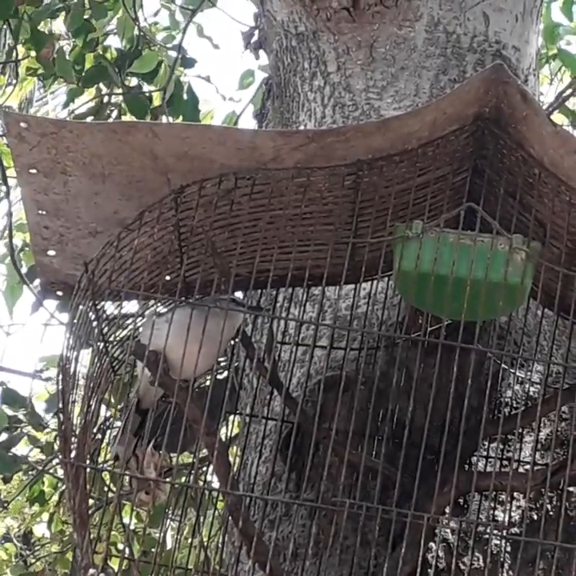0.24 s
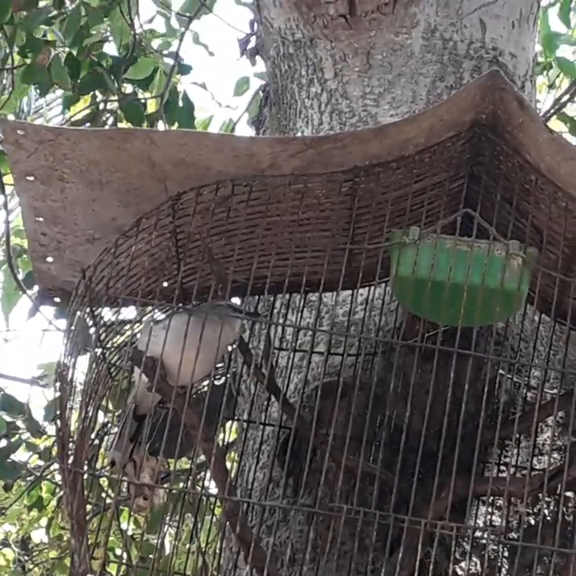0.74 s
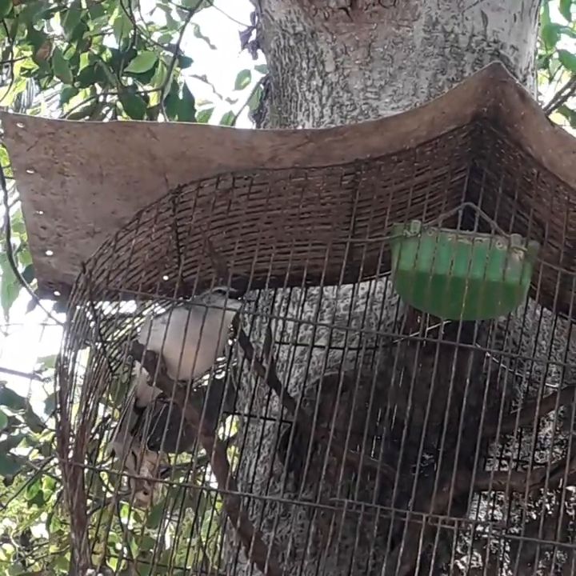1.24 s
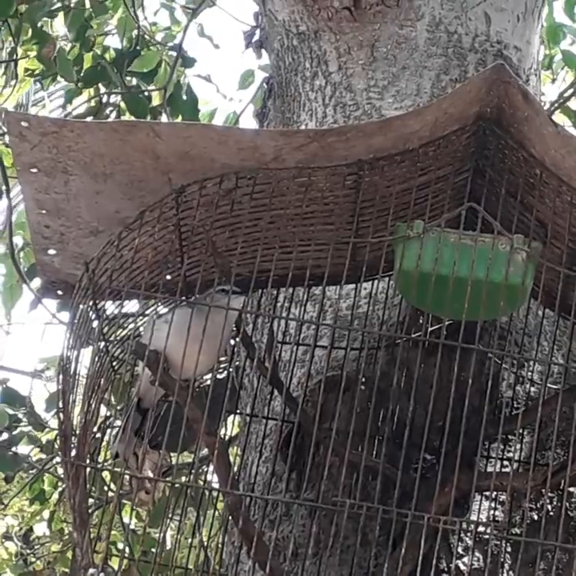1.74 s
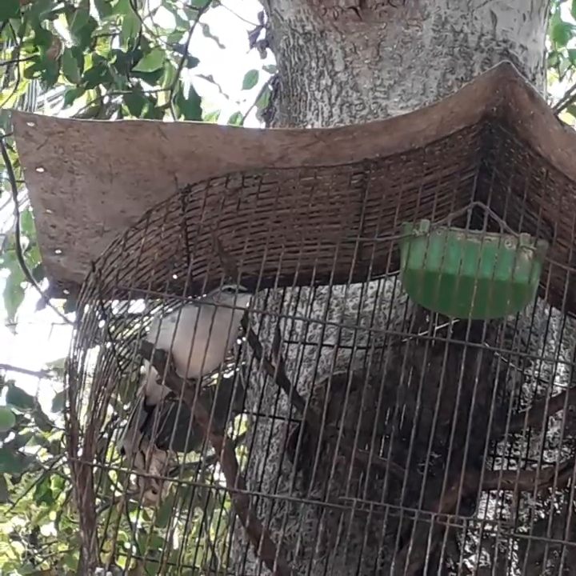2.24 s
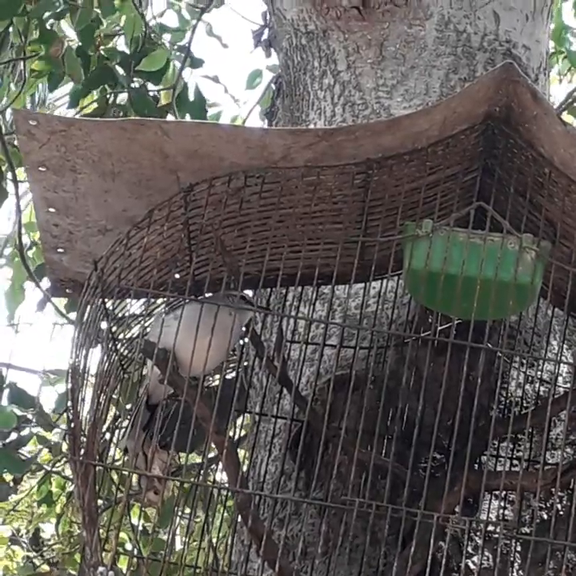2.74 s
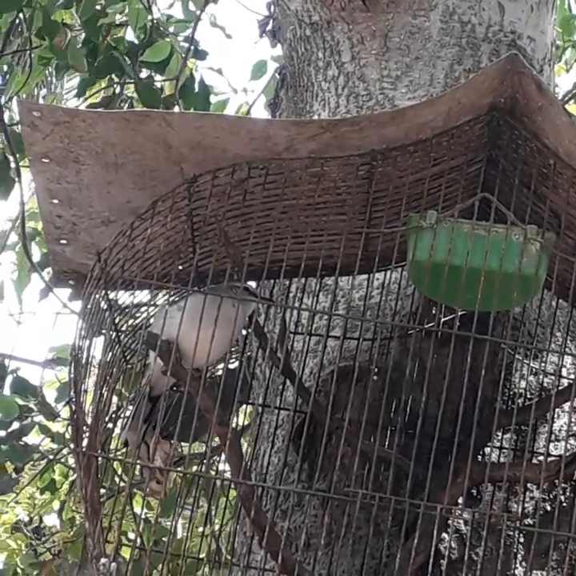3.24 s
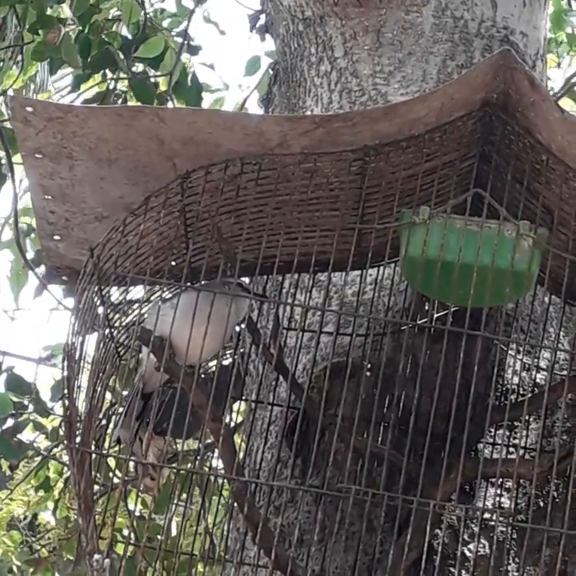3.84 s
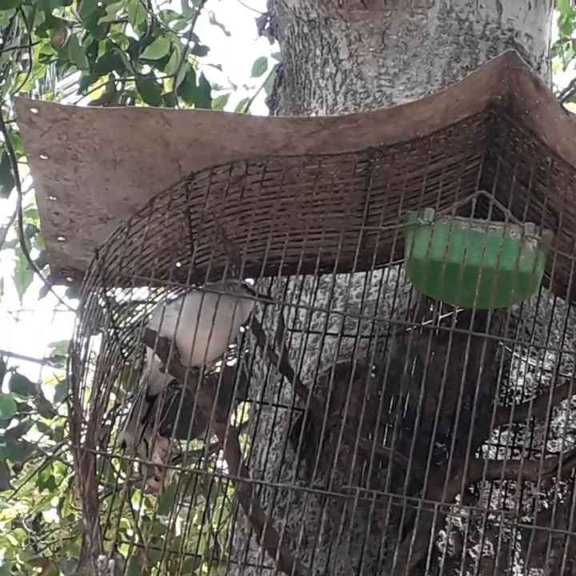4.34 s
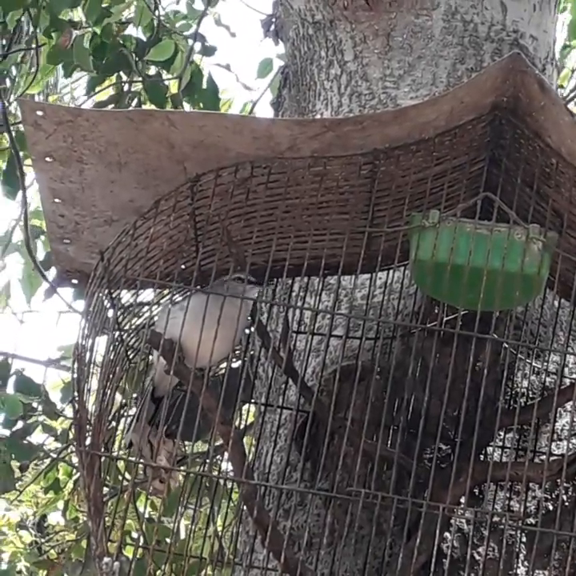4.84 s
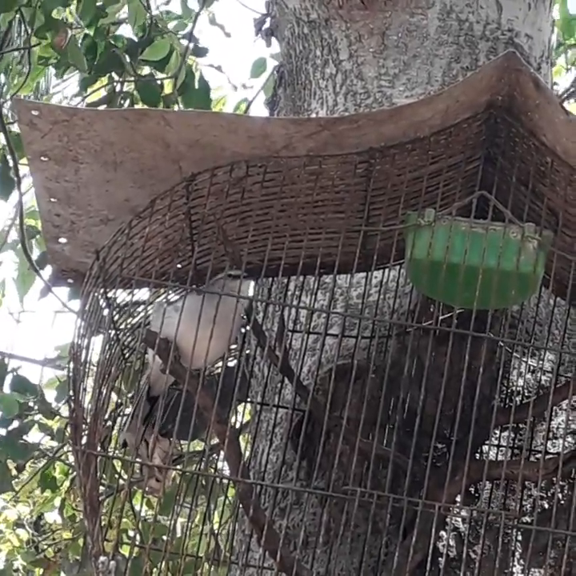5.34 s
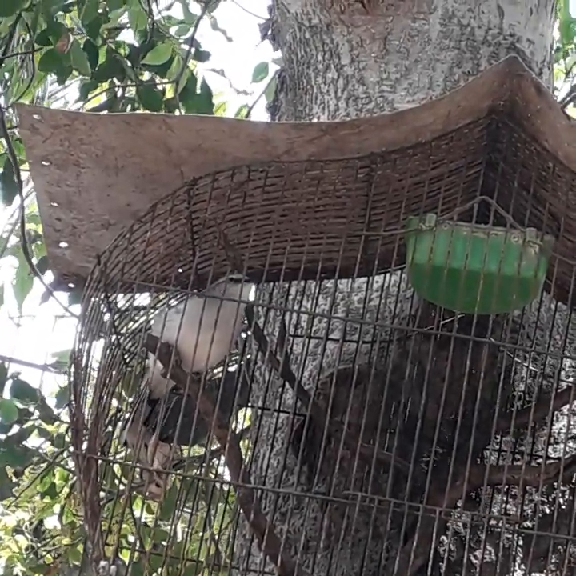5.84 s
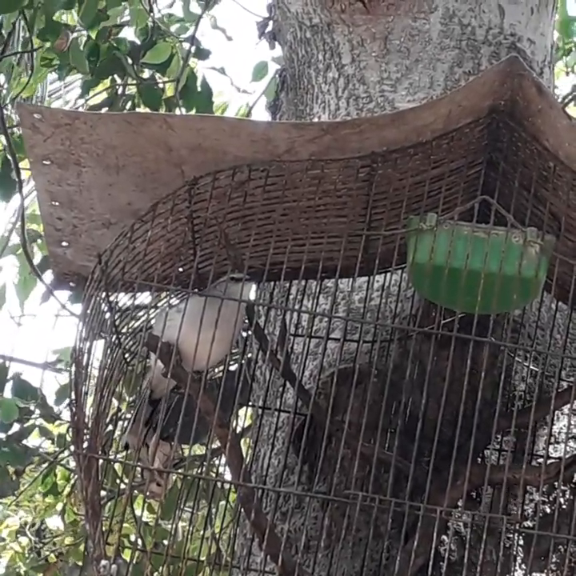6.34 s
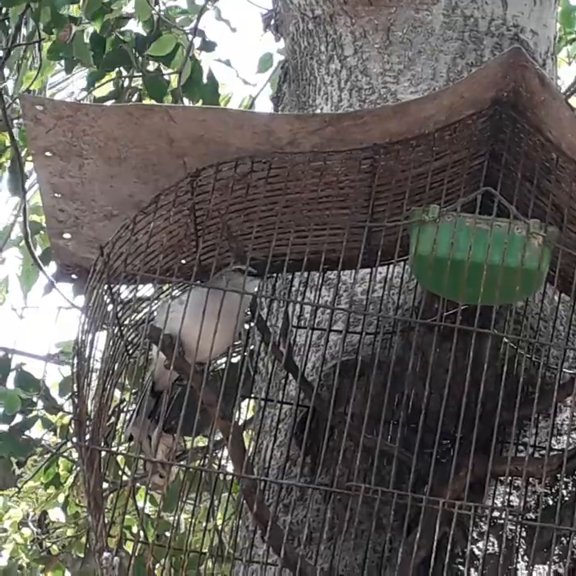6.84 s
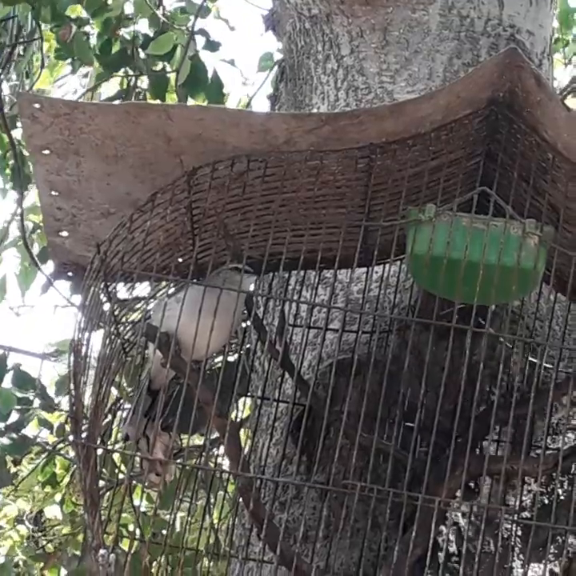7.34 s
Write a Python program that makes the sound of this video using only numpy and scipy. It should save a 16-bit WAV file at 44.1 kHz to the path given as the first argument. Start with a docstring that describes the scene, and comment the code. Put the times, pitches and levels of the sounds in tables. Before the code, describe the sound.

Outdoors, a single caged bird gives a varied, loud song with hard early echoes and a short reverberant tail. Repeated three-part chirps give way to a dry chuck, a grating rasp, then five stuttering buzzes flipping up high, one overlapped by a breathy wheeze. Long fluttering whistles sink and climb near the end. Quiet hiss, low rumble and a few dull knocks sit behind.

```python
"""Caged mockingbird in a walled yard

After the last moment of a buzzy upslur, a bird gives six quick chirps, a chuck, a rasp and five buzzy
upslurs, with a wheeze over the second, then two long whistles that dip and rise, and a third cut off
as it sinks. Gliding tones with a fast tremor make the clear notes; click trains and noise shaped by
the throat make the harsh ones. Roof and walls echo. Behind it, shaped noise and fuzzy hums make a
town rumble and a hiss, with dull knocks and far tones."""
import sys
import numpy as np
from scipy import signal
from scipy.fft import rfft, irfft, next_fast_len
from scipy.io import wavfile
from scipy.ndimage import uniform_filter1d, map_coordinates

SR = 44100
rng = np.random.default_rng(int(sys.argv[2]) if len(sys.argv) > 2 else 0)


def unload_audio(sound):
    """Save the sound as a 16-bit wav file, at the path given as the first command line argument."""
    columns = np.transpose(np.atleast_2d(sound))
    # keep every value between -1 and 1, then stretch to whole-number steps
    steps = np.round(np.clip(columns, -1, 1) * 32767)
    wavfile.write(sys.argv[1], SR, steps.astype(np.int16))


N = 333837  # length of the scene in samples

# Levels in the tables are those of each part before it is mixed, echoed and picked up.


def amp(db):
    """Turn decibels into gain."""
    return 10 ** (np.asarray(db) / 20)


def unit(x):
    """Scale a sound to an rms strength of 1."""
    return x / np.sqrt(np.mean(x ** 2) + 1e-20)


def along(points, hz):
    """Read a curve of (Hz, value) points, with pitch on a log axis."""
    point_hz, value = np.transpose(points)
    return np.interp(np.log(hz + 1), np.log(point_hz + 1), value)


def level(rows):
    """Gain at every sample from (time_s, level_db) rows, silent outside them."""
    time_s, db = np.transpose(rows)
    return amp(np.interp(np.arange(N) / SR, time_s, db, left=-120, right=-120))


def drift(rows):
    """Gain at every sample from (time_s, level_db) rows, held beyond the ends."""
    time_s, db = np.transpose(rows)
    return amp(np.interp(np.arange(N) / SR, time_s, db))


def wobble(rate, samples=None):
    """A smooth random curve with rate knots a second, at the given samples (all by default)."""
    knots = rng.standard_normal(N // 8)
    if samples is None:
        samples = np.arange(N)
    return map_coordinates(knots, [samples * rate / SR], order=2, mode="wrap")


def filtered(x, response):
    """Multiply the spectrum of a sound by a response that depends on frequency."""
    size = next_fast_len(N + SR // 2)
    hz = np.fft.rfftfreq(size, 1 / SR)
    return irfft(rfft(x, size) * response(hz), size)[:N]


def coloured(x, spectrum):
    """Shape a sound by (Hz, dB) points, then scale it to rms 1."""
    return unit(filtered(x, lambda hz: amp(along(spectrum, hz))))


def swell(u, peak, rise_db, fall_db):
    """Level in dB along a note (u from 0 to 1): it grows to its loudest moment, then fades."""
    return np.interp(u, [0, np.clip(peak, .01, .99), 1], [-rise_db, 0, -fall_db])


def mockingbird():
    """The whole song, from gliding tones and harsh noises; each chirp is a hook, a pip and a plunge."""
    song = chirps() + amp(-2) * buzzy_upslurs() + long_whistles()
    return song + chuck() + rasp() + wheeze()


def chirps():
    """Six chirps: a low hook with a second voice beside it, a clear pip and a hoarse plunge."""
    # soft low hooks: start_s, length_s, top_pitch_hz, level_db
    hook_rows = [(0.805, 0.034, 2365, -34), (1, 0.046, 2174, -27), (1.178, .052, 2115, -27),
                 (1.387, 0.05, 2115, -28), (1.619, .044, 1807, -35), (1.858, 0.051, 2035, -31)]
    # the other side of the syrinx beside each hook: s after its start, pitch_hz, dB against the hook
    flick_shape = [(-.012, 2420, -11), (.003, 2950, -9.5), (.018, 3450, -14.5)]
    # clear pips: start_s, length_s, first_pitch_hz, last_pitch_hz, level_db, loudest (share of length)
    pip_rows = [(.832, .062, 2316, 2464, -18, .82), (1.045, 0.038, 2326, 2703, -13, 0.3),
                (1.233, 0.046, 2520, 2641, -14.5, 0.098), (1.429, 0.048, 2195, 2782, -16, 0.41),
                (1.665, .056, 2305, 2650, -14.5, 0.18), (1.921, 0.037, 2284, 2630, -16, .14)]
    # hoarse plunges: start_s, length_s, settling_pitch_hz, plunge_time_s,
    # share of pitch lost at the end, level_db, loudest (share of length)
    plunge_rows = [(.899, .059, 4283, .012, .03, -13.5, 0.77), (1.104, 0.045, 4443, .004, .15, -10.5, .42),
                   (1.29, 0.049, 4252, 0.0044, 0.072, -9.5, 0.44),
                   (1.501, .031, 4223, 0.0041, 0.11, -13, 0.64),
                   (1.717, 0.0088, 3400, 0.0019, 0.066, -15.5, 0.7),
                   (1.736, 0.037, 4025, .0024, .27, -12.5, 0.08),
                   (1.817, 0.03, 3380, .004, 0.094, -22, 0.52), (1.994, .041, 4126, .002, .1, -16, 0.25)]
    hooks = syrinx([hook(*row) for row in hook_rows], tremor_hz=103, tremor_depth=0.02, throb_db=2.6,
                   jitter=0.02, tremor_from=1, tremor_to=0.88, hoarse=0.028, overtone_db=5)
    flick_notes = [np.add(flick_shape, (start, 0, db)) for start, _, _, db in hook_rows]
    flicks = syrinx(flick_notes, tremor_hz=107, tremor_depth=0.009, throb_db=3.0,
                    jitter=0.012, tremor_from=1, tremor_to=1)
    pips = syrinx([pip(*row) for row in pip_rows], tremor_hz=104.2, tremor_depth=0.024, throb_db=-0.5,
                  jitter=0.017, tremor_from=1, tremor_to=0.81, hoarse=0.022, overtone_db=-2.5)
    plunges = syrinx([plunge(*row) for row in plunge_rows], tremor_hz=413.4, tremor_depth=.028,
                     throb_db=0.5, jitter=0.036, tremor_from=1.5, tremor_to=0.31,
                     hoarse=0.11, overtone_db=-5.0)
    return hooks + flicks + pips + plunges


def hook(start, length, top_hz, db):
    """A quick flick up that sags again, as (s, Hz, dB) points."""
    # share of the length, pitch ratio to the top pitch, dB against the hook's level
    hook_shape = [(0, .74, -11), (0.301, 0.95, 4), (1, .92, -10)]
    u, ratio, shape_db = np.transpose(hook_shape)
    return np.transpose([start + u * length, top_hz * ratio, db + shape_db])


def pip(start, length, first_hz, last_hz, db, peak):
    """A clear note whose rise levels off, as (s, Hz, dB) points."""
    u = np.linspace(0, 1, 40)
    bend = 1.71  # above 1, the rise flattens out
    hz = last_hz + (first_hz - last_hz) * (1 - u) ** bend
    return np.transpose([start + u * length, hz, db + swell(u, peak, rise_db=6, fall_db=13.5)])


def plunge(start, length, settle_hz, plunge_s, droop, db, peak):
    """The membrane slackens: the pitch drops, settles as the note gains strength, and droops at the end."""
    u = np.linspace(0, 1, 60)
    start_ratio, droop_power = 1.66, 3  # first pitch over settling pitch; how late the droop comes
    high_loss_db = 26  # the note is weaker while high
    tension = np.exp(-u * length / plunge_s)
    hz = settle_hz * (1 + (start_ratio - 1) * tension) * (1 - droop * u ** droop_power)
    note_db = db - high_loss_db * tension + swell(u, peak, rise_db=6, fall_db=13.5)
    return np.transpose([start + u * length, hz, note_db])


def buzzy_upslurs():
    """All the buzzy notes that break upward, added together; the first has begun before the scene."""
    # start_s, low_part_s, high_part_s, tremor_hz, low_pitch_hz, top_pitch_hz,
    # low_db, high_db, growth_db, loudest (share of the low part)
    upslur_rows = [(-.1, 0.089, 0.055, 71, 2700, 3900, -28, -32, 20, .7),
                   (3.854, .076, .09, 81.9, 2468, 3504, -17.5, -21, 30, 0.77),
                   (4.059, 0.079, 0.098, 81.3, 2582, 4130, -14.5, -16.5, 23.5, 0.64),
                   (4.312, 0.094, .063, 69.74, 2610, 4435, -16, -16.5, 13, 0.63),
                   (4.538, .102, 0.1, 57.8, 2528, 4840, -16, -19.5, 28, 0.43),
                   (4.808, 0.087, 0.11, 70.25, 2392, 4610, -19, -20.5, 22, 0.57)]
    return sum(upslur(*row) for row in upslur_rows)


def upslur(start, low_s, high_s, tremor_hz, low_hz, top_hz, low_db, high_db, growth_db, peak):
    """A low stuttering buzz swells, breaks into the high register and climbs."""
    # low part: share of the part, Hz above the low pitch
    low_shape = [(0, 111.5), (.35, -31.5), (.7, 90.5), (1, 291.5)]
    # high part: share of the part, share of the rise in pitch, dB against high_db
    high_shape = [(.06, .42, -0.5), (.34, .77, -3.5), (.6, .93, -9), (1, 0.93, -7.5)]
    u = np.linspace(0, 1, 30)
    offset_hz = np.interp(u, *np.transpose(low_shape))
    buzz_db = low_db + swell(u, peak, growth_db, fall_db=7)
    low = [start + u * low_s, low_hz + offset_hz, buzz_db]
    v, rise, shape_db = np.transpose(high_shape)
    high = [start + low_s + v * high_s, low_hz + (top_hz - low_hz) * rise, high_db + shape_db]
    return syrinx([np.hstack([low, high]).T], tremor_hz=tremor_hz, tremor_depth=0.079, throb_db=5.5,
                  jitter=0.026, tremor_from=1.31, tremor_to=0.64, hoarse=0.013, overtone_db=-6.5)


def long_whistles():
    """Trilled whistles, the last cut off as it sinks, with high noise following as a sizzling edge."""
    # start_s, fall_s, rise_s, hold_s, tremor_hz, pitch ratio of the fall, of the rise,
    # fall_db, rise_db, closing_db
    whistle_rows = [(5.306, 0.2, .161, .04, 77.75, .945, .965, -21, -18.5, -26),
                    (6.655, 0.16, .165, .065, 84.13, 1.01, 1.03, -19, -18.5, -18.5),
                    (7.431, 0.12, 0.2, .05, 84.9, 1.013, 1.005, -17.5, -18, -24)]
    # the very high edge: pitch_hz, level_db
    sizzle_spectrum = [(13500, -61), (14700, -8.5), (15100, 8.5), (15800, -8.5)]
    whistles = sum(whistle(*row) for row in whistle_rows)
    strength = uniform_filter1d(np.abs(whistles), size=600)
    return whistles + amp(-42) * strength * coloured(rng.standard_normal(N), sizzle_spectrum)


def whistle(start, fall_s, rise_s, hold_s, tremor_hz, fall_ratio, rise_ratio, fall_db, rise_db, closing_db):
    """A trilled tone that sinks to a weak low point, then, if the scene lasts, climbs and holds its top."""
    # both halves: share of the half, pitch_hz before the pitch ratio, dB against the level of the half
    fall_shape = [(0, 3277, -34), (.13, 2904, -13), (.19, 2681, 1), (.4, 2333, 0.5), (.68, 2150, -2.5),
                  (1, 1861, -12.5)]
    rise_shape = [(0.218, 2040, -13), (.41, 2442, 2.5), (.66, 2630, 0.5), (.84, 3178, 1), (1, 3560, -5.5)]
    fall = np.array(fall_shape) * [fall_s, fall_ratio, 1] + [start, 0, fall_db]
    rise = np.array(rise_shape) * [rise_s, rise_ratio, 1] + [start + fall_s, 0, rise_db]
    # the held top creeps up to 3620 Hz times the ratio of the rise
    hold = (rise[-1, 0] + hold_s, 3620 * rise_ratio, closing_db)
    return syrinx([np.vstack([fall, rise, hold])], tremor_hz=tremor_hz, tremor_depth=0.06, throb_db=2.0,
                  jitter=0.014, tremor_from=0.63, tremor_to=0.8, hoarse=0.013, overtone_db=-5.5)


def chuck():
    """A short harsh note: membrane slaps and air in the throat, with a throbbing tone on top."""
    # strength of the harsh sound: time_s, level_db
    chuck_effort = [(3.076, -37), (3.081, -24), (3.095, -29.5), (3.115, -24), (3.13, -46)]
    # throat resonance: pitch_hz, level_db
    chuck_throat = [(530, -55), (900, -21), (1070, -29), (1180, -57), (1370, -17.5), (1900, -15.5),
                    (2050, -11), (2240, -5.5), (3320, -9.5), (4400, -19), (7000, -38.5), (9100, -53),
                    (15400, -120)]
    # one tone: time_s, pitch_hz, level_db
    chuck_tone = [
        [(3.076, 3410, -32), (3.081, 3470, -29.5), (3.1, 3227, -31.5), (3.115, 3260, -40)],
    ]
    slaps = amp(-5.5) * harsh(chuck_effort, chuck_throat, pulse_hz=332.0, glide=0.11,
                              scatter=0.11, noise_share=0.28)
    return slaps + syrinx(chuck_tone, tremor_hz=320, tremor_depth=0.01, throb_db=7.5,
                          jitter=0.021, tremor_from=0.78, tremor_to=0.7)


def rasp():
    """Both sides of the syrinx sound at once, a low rattle and a rising squeal, with a faint tone."""
    # strength of the harsh sound: time_s, level_db
    rasp_effort = [(3.415, -41.5), (3.455, -33), (3.49, -34.5), (3.525, -32.5), (3.55, -40)]
    # throat resonance: pitch_hz, level_db
    rasp_throat = [(470, -67), (800, -21.5), (970, -11), (1080, -26), (1250, -17.5), (1630, -17.5),
                   (2040, 0), (2330, 0), (2420, -8), (3170, 0.5), (3920, -9), (4320, -8.5), (5090, -20),
                   (8000, -27.5), (10400, -44), (17600, -120)]
    # one tone: time_s, pitch_hz, level_db
    rasp_tone = [
        [(3.47, 1002, -54), (3.5, 1200, -54), (3.522, 1308, -45), (3.548, 1310, -51.5)],
    ]
    rattle = harsh(rasp_effort, rasp_throat, pulse_hz=230.6, glide=0.86, scatter=.02, noise_share=0.25)
    squeal = harsh(rasp_effort, rasp_throat, pulse_hz=920, glide=2.2, scatter=0.021, noise_share=0.12)
    tone = syrinx(rasp_tone, tremor_hz=235, tremor_depth=.01, throb_db=1.5,
                  jitter=0.012, tremor_from=1, tremor_to=0.93)
    return rattle + amp(-9) * squeal + tone


def wheeze():
    """Breathy noise shaped by the throat, with no pitch of its own."""
    # strength: time_s, level_db
    wheeze_effort = [(4.03, -49.5), (4.06, -45.5), (4.14, -42), (4.2, -39), (4.23, -55.5)]
    # throat resonance: pitch_hz, level_db
    wheeze_throat = [(4000, -25.5), (5200, 2.5), (5800, 5), (6600, -0.5), (7800, -3), (9500, -24.5),
                     (15000, -24)]
    return level(wheeze_effort) * coloured(rng.standard_normal(N), wheeze_throat)


def syrinx(notes, tremor_hz, tremor_depth, throb_db, jitter, tremor_from, tremor_to,
           hoarse=.01, overtone_db=0, edge_s=0.00083, smear=0.81):
    """A nearly pure gliding tone; a fast muscle tremor swings its pitch and strength.

    The tremor changes from tremor_from to tremor_to along each note of (s, Hz, dB) points;
    hoarseness spreads a skirt round the tone."""
    # overtones radiated by the open beak: pitch_hz, level_db against the main tone before overtone_db
    beak = [(3000, -32.5), (5000, -47), (6300, -46.5), (7600, -31.5), (8600, -35.5), (10000, -34.5),
            (13000, -22.5), (16000, -29.5)]
    out = np.zeros(N)
    for note in notes:
        time_s, pitch_hz, db = np.transpose(note)
        samples = np.arange(max(int(time_s[0] * SR), 0), min(int(time_s[-1] * SR), N))
        t = samples / SR
        unsteady, pace = wobble(900, samples), wobble(25, samples)
        flutter, blur = wobble(2200, samples), wobble(1400, samples)
        tremor = 2 * np.pi * np.cumsum(tremor_hz * (1 + 0.039 * pace)) / SR
        shake = np.clip(np.linspace(tremor_from, tremor_to, len(samples)), 0, 2)
        hz = uniform_filter1d(np.interp(t, time_s, pitch_hz), size=130)
        hz = hz * (1 - tremor_depth * shake * np.sin(tremor) + jitter * unsteady)
        phase = 2 * np.pi * np.cumsum(hz) / SR
        tone = np.sin(phase)
        for k in range(2, 4):
            # overtones are rougher than the main tone, and none passes half the sample rate
            strength = amp(along(beak, k * hz) + overtone_db - 15.9 * (k - 3))
            strength = strength * (k * hz < SR / 2)
            tone += strength * np.sin(k * phase + smear * blur)
        fade = np.clip(np.minimum(t - time_s[0], time_s[-1] - t) / edge_s, 0, 1)
        # with a positive throb, the tone is strongest on the upward swing of the tremor
        loudness = amp(np.interp(t, time_s, db) - throb_db * shake * np.cos(tremor - np.pi / 8))
        out[samples] += np.sqrt(2) * tone * fade * loudness * (1 + hoarse * flutter)
    return out


def harsh(effort, throat, pulse_hz, glide, scatter, noise_share):
    """Uneven membrane slaps, speeding up at the rate glide, ring in the throat with turbulent air."""
    since_s = np.clip(np.arange(N) / SR - effort[0][0], 0, 1)
    slap_hz = pulse_hz * np.exp(glide * since_s + scatter * wobble(300))
    cycles = np.cumsum(slap_hz) / SR
    slaps = unit(np.diff(np.floor(cycles), prepend=0))  # one click per cycle
    return level(effort) * coloured(slaps + noise_share * rng.standard_normal(N), throat)


def early_echoes(x):
    """Single bounces off the cage roof, the ground and the nearest walls: delayed copies."""
    # delay_s, gain (a minus sign flips the wave)
    bounces = [(.0024, 0.25), (.0074, -0.085), (.0098, -0.52), (0.011, -0.63), (0.0159, .25), (.0283, 0.45)]
    return sum(gain * np.pad(x, (int(delay * SR), 0))[:N] for delay, gain in bounces)


def reverberation(x, build_s=0.0066):
    """The diffuse answer of the yard: noise that builds up briefly, then dies, mostly treble first."""
    # pitch_hz, time to fall by 60 dB in s
    yard_decay = [(300, 1), (2500, 0.39), (4500, 0.45), (8000, 0.36), (15000, 0.34)]
    hz, t, grains = signal.stft(rng.standard_normal(int(SR * 3 / 4)), SR, nperseg=256)
    decay = amp(-60 * t / along(yard_decay, hz)[:, None])
    tail = signal.istft(grains * decay * (1 - np.exp(-t / build_s)), SR, nperseg=256)[1]
    return signal.fftconvolve(x, tail / np.linalg.norm(tail))[:N]


def far_tones():
    """Faint gliding tones from beyond the yard, each a wavering sine and its octave."""
    # start_s, end_s, pitch_hz, glide_hz over the tone, level_db, octave_db against the tone,
    # waver (share of pitch)
    far_rows = [(1.966, 2.553, 885, 9.5, -49, -4, 0.087), (5.572, 5.696, 824, -10, -40, -4.5, 0.022),
                (6.07, 6.437, 1673, -8, -51, -9.5, 0.009), (6.245, 6.81, 961.5, -13.5, -52.5, -14, 0.012),
                (6.724, 6.898, 958, 93.5, -49.5, -24, 0.01832), (6.907, 7.503, 935, 49, -56, -20, 0.048),
                (7.406, 7.617, 558.4, 16, -50.5, -8, 0.047)]
    t, waver, out = np.arange(N) / SR, wobble(150), np.zeros(N)
    for start, end, hz, glide, db, octave_db, share in far_rows:
        pitch_hz = np.interp(t, [start, end], [hz, hz + glide]) * (1 + share * waver)
        phase = 2 * np.pi * np.cumsum(pitch_hz) / SR
        fade = np.clip(np.minimum(t - start, end - t) / 0.035, 0, 1)
        out += amp(db) * fade * (np.sin(phase) + amp(octave_db) * np.sin(2 * phase))
    return out


def background():
    """Town rumble, two hums and soft knocks, under a gently wavering outdoor hiss."""
    return town_rumble() + hums() + bumps() + hiss()


def town_rumble():
    """Low shaped noise whose strength drifts and wavers."""
    # drift: time_s, level_db
    town_level = [(0.3, -39), (1.57, -43), (5.6, -49), (6.71, -49), (7.3, -50.5)]
    # colour: pitch_hz, level_db
    rumble_spectrum = [(15, -56), (25, -30), (44, -9), (80, -4), (114, -6), (146, 0.5), (216, -2.5),
                       (254, -5.5), (292, -8.5), (331, -8), (447, -14.5), (500, -14.5), (650, -50),
                       (1100, -120)]
    waver = amp(-1 + 1.4 * wobble(4.8))
    return drift(town_level) * waver * coloured(rng.standard_normal(N), rumble_spectrum)


def hums():
    """Two fuzzy low lines, each with its own slow drift in level."""
    # both: time_s, level_db
    low_level = [(0, -39), (.8, -41.5), (2.3, -44), (3.1, -43), (4.2, -42), (5.2, -48), (7.57, -49.5)]
    high_level = [(0, -48), (2.4, -44), (4.6, -56), (6.2, -43), (7.57, -55.5)]
    return drift(low_level) * hum(116, db=-4.5) + drift(high_level) * hum(176, db=-4.5)


def hum(hz, db, waver=0.8):
    """One sine made fuzzy by random changes in phase (waver, radians) and strength."""
    phase = 2 * np.pi * hz * np.arange(N) / SR + waver * wobble(22)
    return amp(db + 4.24 * wobble(16)) * np.sin(phase)


def bumps(t60_s=0.043):
    """Soft dull knocks: low sines that die within a few cycles."""
    # start_s, pitch_hz, level_db before a shared lift of 10.5 dB
    bump_rows = [(3.163, 225.6, -38), (3.17, 70, -35.5), (3.724, 95, -38)]
    out = np.zeros(N)
    for start, hz, db in bump_rows:
        age_s = np.maximum(np.arange(N) / SR - start, 0)
        out += amp(db + 10.5 - 60 * age_s / t60_s) * np.sin(2 * np.pi * hz * age_s)
    return out


def hiss():
    """Soft shaped noise with a small slow waver in level."""
    # colour: pitch_hz, level_db
    air_spectrum = [(150, -18), (400, -0.5), (700, -1), (1200, -2), (2200, 1), (3200, -5.5), (4400, -2),
                    (6000, -8.5), (8000, -13), (12000, -18.5), (16000, -23.5)]
    return amp(-45 + 1.2 * wobble(2.3)) * coloured(rng.standard_normal(N), air_spectrum)


def scene():
    """The bird is near, with strong echoes; the far tones come both direct and scattered."""
    song, far = mockingbird(), far_tones()
    near = amp(-0.5) * (song + early_echoes(song)) + amp(-3) * reverberation(song)
    return (near + far + reverberation(far) + background())[None]


def record(dry):
    """The microphone has little deep bass, a hollow in the high treble and a steep band limit."""
    # pitch_hz, level_db
    microphone = [(20, -9.5), (45, 0), (8400, -1.5), (9100, -9), (9700, -17), (10600, -17), (12000, -10),
                  (14000, -8.5), (15800, -5)]
    top_hz = 15850  # nothing passes from here up
    return filtered(dry[0], lambda hz: amp(along(microphone, hz)) * (hz < top_hz))[None]


dry = scene()
out = record(dry)
unload_audio(out)
```